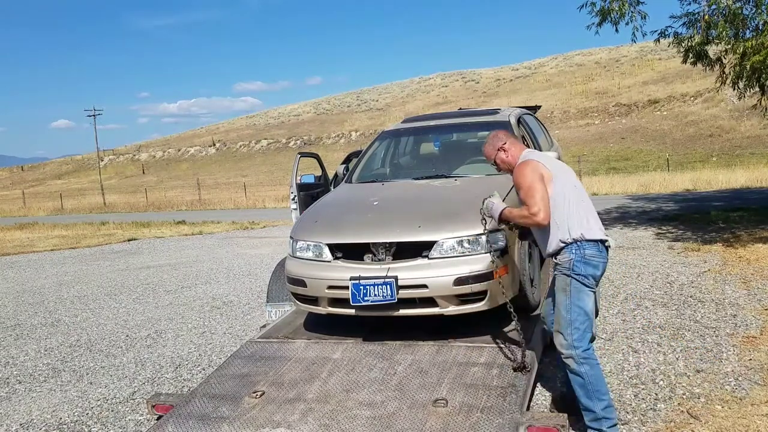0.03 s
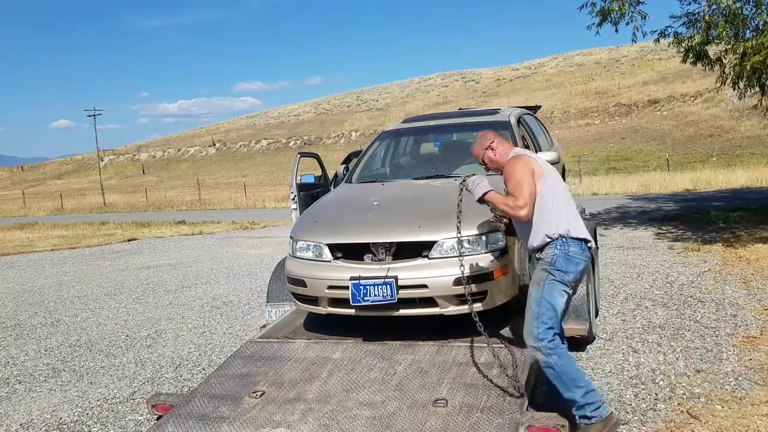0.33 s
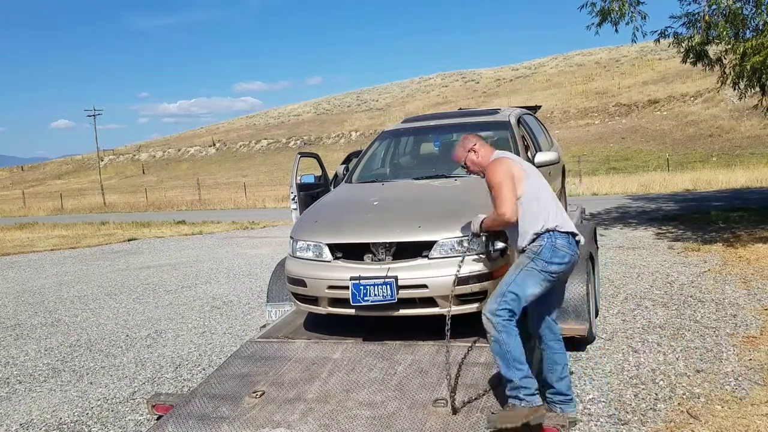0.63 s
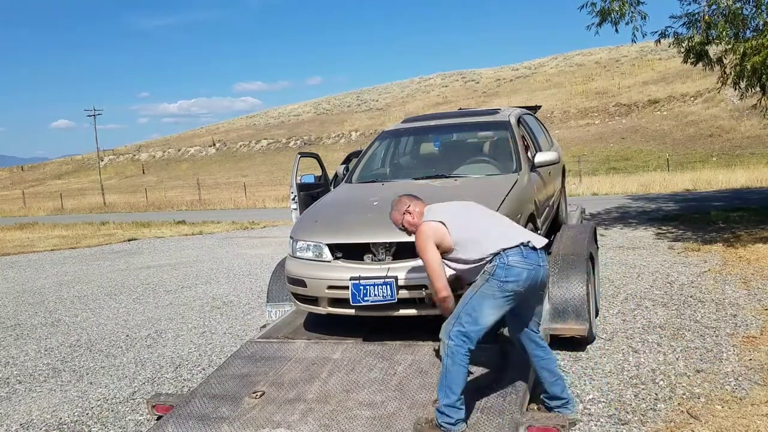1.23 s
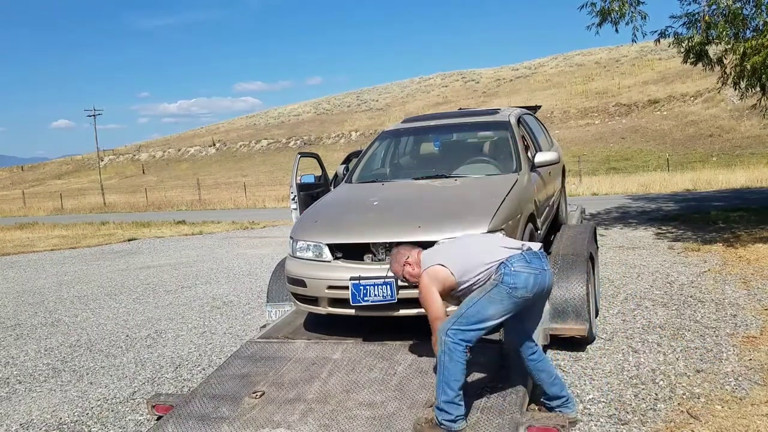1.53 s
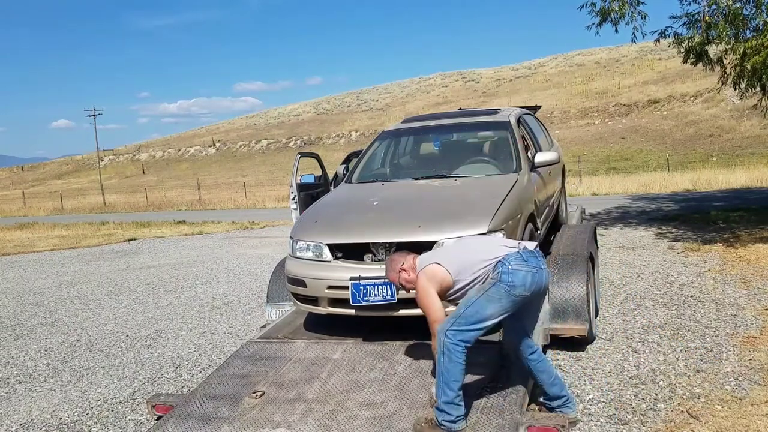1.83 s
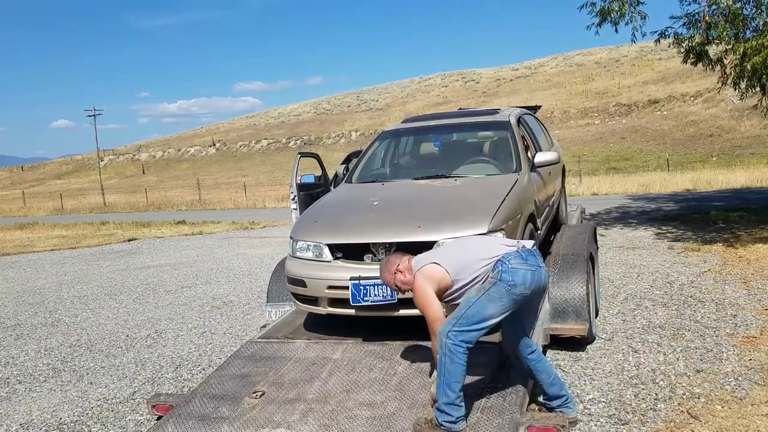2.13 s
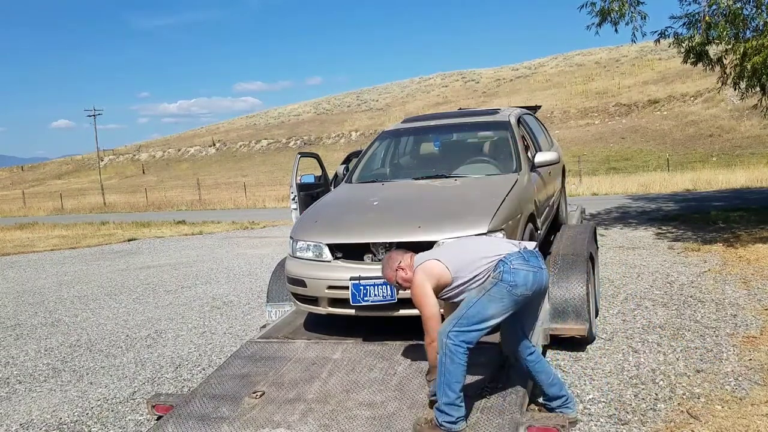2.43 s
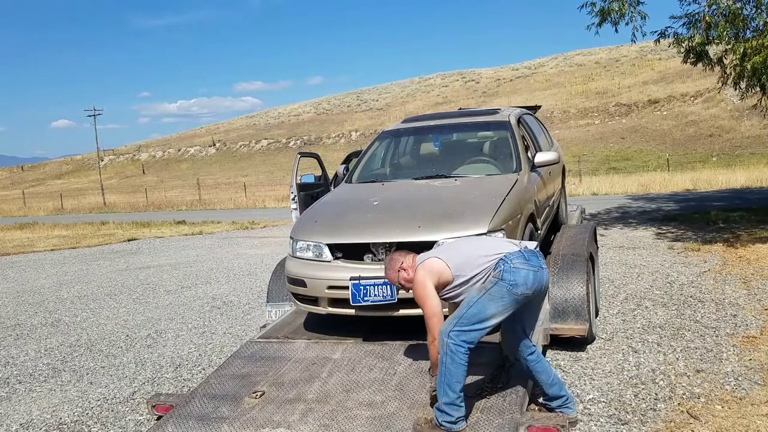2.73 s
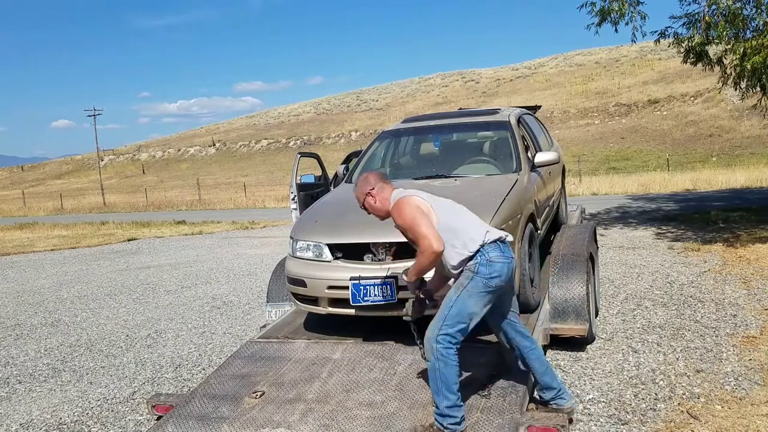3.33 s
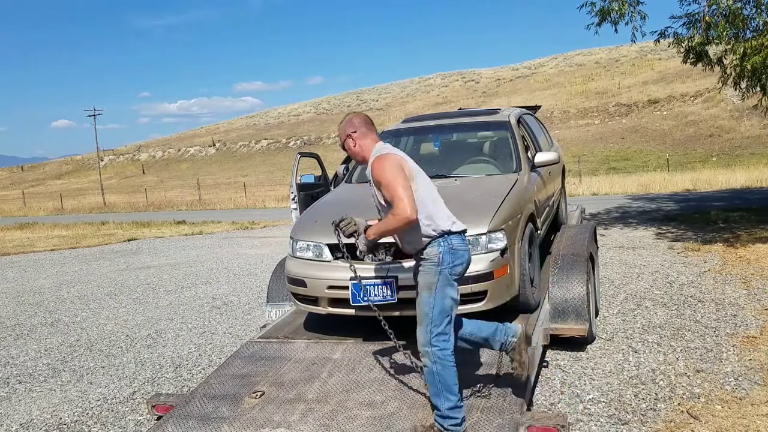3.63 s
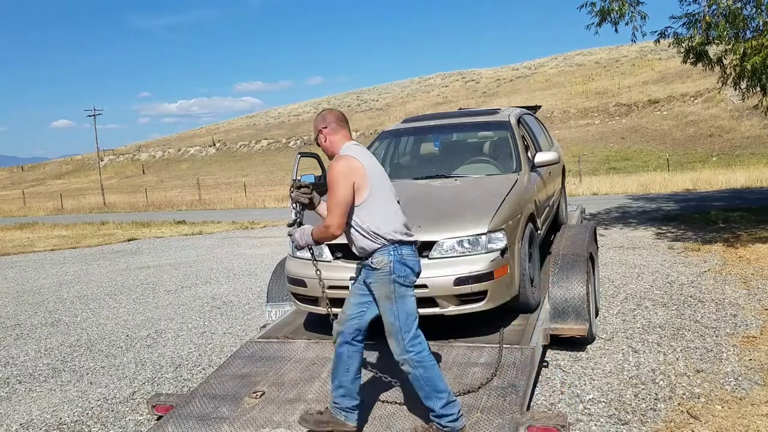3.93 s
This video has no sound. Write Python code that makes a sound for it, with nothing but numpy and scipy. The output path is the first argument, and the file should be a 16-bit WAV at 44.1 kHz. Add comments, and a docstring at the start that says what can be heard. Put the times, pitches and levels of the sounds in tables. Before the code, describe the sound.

A steel chain is hauled and dropped on a trailer ramp, links clacking and ringing. In a lull its hook taps lightly, then the chain drags again as boots thud. It is heard from a few metres away outdoors.

```python
"""A steel tow chain on the ramp of a car trailer, outdoors, in stereo from a few metres away.
First the chain is hauled over the ramp and dropped, as two light gusts brush the microphone: links
clack and ring very high, and the steel deck clatters under them. Around 2 s, in a lull, the hook taps
its anchor under the car. Then the chain is pulled out again, the loose hook jingles over the deck
and boots thud on the plate. A faint breeze lies under it all."""
import sys
import numpy as np
from scipy import signal
from scipy.fft import rfft, irfft
from scipy.io import wavfile

SR = 44100
rng = np.random.default_rng(int(sys.argv[2]) if len(sys.argv) > 2 else 0)


def digitize_waveform(pressure):
    """Quantize a signal to 16-bit integers and store it at the path in sys.argv[1].

    Rows of a 2-D input are taken as channels; values are limited to [-1, 1].
    """
    field = np.atleast_2d(pressure).T
    bounded = np.clip(field, -1, 1)
    quanta = np.round(bounded * 32767).astype(np.int16)
    wavfile.write(sys.argv[1], SR, quanta)


N = 176400  # 4 s


def amp(db):
    """Decibels to gain."""
    return 10 ** (np.asarray(db) / 20)


def unit(x):
    """Scale a response to unit energy, averaged over its channels."""
    return x / np.sqrt(np.mean(np.sum(x ** 2, axis=-1)))


def pan(left_db):
    """Stereo gains that put the left side this far above the right."""
    return amp(np.array([[left_db], [-left_db]]) / 2)


def decay(t, t60):
    """Envelope that falls 60 dB in t60 seconds."""
    return np.exp(-np.log(1000) * t / t60)


def along(table, hz):
    """Read a table on a log-frequency axis."""
    freqs, values = np.array(table, float).T
    return np.interp(np.log(hz + 1), np.log(freqs), values)


def add(out, start_s, x):
    """Mix a sound in at a time."""
    i = max(int(start_s * SR), 0)
    out[..., i:i + x.shape[-1]] += x[..., :max(N - i, 0)]


def stereo_noise(size):
    """White noise, alike on both sides in the bass and wide in the treble."""
    # stereo width at the microphone: f/Hz, side level/dB
    width = [(60, -11.5), (300, -22), (600, -13), (1100, -9), (2200, -6.5), (4500, -1.5), (15000, 2.5)]
    mid, side = rfft(rng.standard_normal((2, size)))
    w = amp(along(width, np.fft.rfftfreq(size, 1 / SR)))
    return irfft(np.array([mid + w * side, mid - w * side]) / np.sqrt(1 + w * w), size)


def colour(x, spectrum, size=2048):
    """Minimum-phase filter with the given spectrum."""
    cepstrum = irfft(np.log(amp(along(spectrum, np.fft.rfftfreq(size, 1 / SR)))))
    cepstrum[1:size // 2] *= 2
    cepstrum[size // 2 + 1:] = 0
    response = irfft(np.exp(rfft(cepstrum)))
    return signal.fftconvolve(x, response[None], axes=1)[:, :x.shape[1]]


def excite(force, response):
    """Sound of a body driven by a force."""
    return signal.oaconvolve(force[None], response, axes=1)[:, :N]


def ring(modes, vary_db, apart_rad, size=30000):
    """Decaying modes; their strengths and left-right phases depend on where the blow lands."""
    t, out = np.arange(size) / SR, 0
    for (hz, db, t60), (strength, skew) in zip(modes, rng.standard_normal((len(modes), 2))):
        phase = apart_rad * skew * np.array([[1], [-1]])
        out = out + amp(db + vary_db * strength) * decay(t, t60) * np.cos(2 * np.pi * hz * t + phase)
    return unit(out)


def steel(spectrum, tail_db, size=24000):
    """Response of one spot: a brief contact crack, then dense plate modes whose treble dies first."""
    # ring time of the plate: f/Hz, t60/s
    plate_t60 = [(100, 0.97), (300, 0.52), (1000, 0.43), (2500, 0.31), (5000, 0.13), (12000, 0.16)]
    t, hz = np.arange(size) / SR, np.fft.rfftfreq(size, 1 / SR)
    noise, tail = rfft(stereo_noise(size)), 0
    for centre, t60 in plate_t60:
        band = along([(f, f == centre) for f, _ in plate_t60], hz)
        tail = tail + irfft(noise * band, size) * decay(t, t60) / np.sqrt(t60)
    crack = stereo_noise(size) * decay(t, t60=0.031)
    return unit(colour(unit(crack) + amp(tail_db) * unit(tail), spectrum))


def knocks(events, modes, vary_db, apart_rad, chatter_s, detune=0., size=4096):
    """Blows that chatter briefly on a ringing body; detune scatters its pitches from blow to blow."""
    out, t = np.zeros((2, N)), np.arange(size) / SR
    for start, db in events:
        force = rng.standard_normal(size) * np.exp(-t / chatter_s)
        shifted = np.array(modes, float)
        shifted[:, 0] *= 1 + detune * rng.standard_normal(len(modes))
        body = np.pad(ring(shifted, vary_db, apart_rad, size=16000), ((0, 0), (0, size)))
        add(out, start, unit(excite(force, body)) * amp(db) * np.sqrt(.04 * SR))
    return out


def breeze():
    """Faint outdoor air; light gusts brush the microphone."""
    # spectra of the open air and of wind on the microphone: f/Hz, relative density/dB
    air_spectrum = [(15, -44), (25, -22), (48, -9.5), (301, 2), (394, -7), (501, -3), (3350, -21.5),
                    (5140, -19), (7280, -35), (15000, -35.5)]
    wind_spectrum = [(20, -22.5), (45, -16), (80, -8), (130, 0), (400, -40), (2000, -69.5)]
    # gusts: t/s, half length/s
    gusts = [(.1, 0.18), (0.846, .15)]
    t = np.arange(N) / SR
    air = colour(stereo_noise(N), air_spectrum)
    wind = colour(stereo_noise(N), wind_spectrum)
    swell = sum(np.exp(-((t - at) / half) ** 2) for at, half in gusts)
    return air / air.std() * amp(-53.5) + wind / wind.std() * swell * amp(-52.5)


def boots():
    """Dull thuds on the ramp, with little deep bass."""
    # boots and heavy loops of chain landing: t/s, level/dB
    landings = [(.42, -56), (.66, -50.5), (.8, -46.5), (.85, -42.5), (.925, -45), (1.27, -43.5),
                (2.63, -37), (2.755, -38.5), (2.827, -30.5), (3.1, -30), (3.15, -36.5), (3.2, -31),
                (3.255, -43)]
    # modes of the ramp: f/Hz, relative level/dB, t60/s
    ramp_modes = [(66.4, -5, .25), (107.7, 3.5, 0.34), (130.5, 4.5, 0.32), (150, -3, 0.31),
                  (177.2, 7.5, 0.47), (252, 9, 0.53)]
    thuds = knocks(landings, ramp_modes, vary_db=0.53, apart_rad=0.1, chatter_s=0.023)
    return signal.sosfilt(signal.butter(3, 75, "highpass", fs=SR, output="sos"), thuds)


def hook_taps():
    """Dry ticks of the hook on its anchor under the car, with a short ring."""
    # taps: t/s, relative level/dB
    taps = [(1.838, -41), (2.02, -57), (2.083, -46.5), (2.257, -48)]
    # modes of the anchor: f/Hz, relative level/dB, t60/s
    anchor_modes = [(3680, 0, 0.15), (4300, -10, .1), (4530, -7, .1), (4720, -2, .06), (5440, 6, 0.053)]
    # contact noise of a tap: f/Hz, relative density/dB
    tick_spectrum = [(800, -22), (2500, -7.5), (4800, 1), (7000, -15.5), (11000, -11.5), (15000, -20)]
    out = knocks(taps, anchor_modes, vary_db=1.1, apart_rad=.9, chatter_s=.003) * amp(-10)
    for start, db in taps:
        add(out, start, steel(tick_spectrum, tail_db=8) * amp(db - 1) * np.sqrt(0.013 * SR))
    return out


def hook_jingle(start_s=2.767, count=22, skips_per_s=19):
    """The loose hook skips unevenly over the deck; every touch brings out other modes."""
    # course of the drag: t/s, relative level/dB
    drag = [(2.77, -28.5), (2.948, -35.5), (3.29, -29.5), (3.358, -61), (3.414, -32.5), (3.516, -37),
            (3.534, -28), (3.578, -39.5), (4.0, -47)]
    # modes of the hook: f/Hz, relative level/dB, t60/s
    hook_modes = [(4630, -5, .06), (5230, 0, .08), (5480, -2, .07), (7800, -10, .07), (8280, -6, .09),
                  (9830, -6, .16), (9980, -3, .16), (10570, -2, .13), (10880, -2, .16), (11400, -12, .08),
                  (13660, -5, .16)]
    skip = np.arange(count)
    times = start_s + (skip + .9 * rng.random(count) * (skip > 0)) / skips_per_s
    levels = np.interp(times, *np.array(drag).T) + 5
    return knocks(zip(times, levels), hook_modes, vary_db=4.5, apart_rad=0.93, chatter_s=.018,
                  detune=0.0053)  # each touch rings at slightly different pitches


def pull_gain(part):
    """Strength of the sliding chain's "clack", "deck" or "ring" over time."""
    # one table per pull: t/s, then relative levels: link clack/dB, deck clatter/dB, link ring/dB
    pulls = [
        [(0.0, -26.5, -26, -18), (0.02, -37, -44, -21.5), (0.076, -26, -28, -28), (0.124, -34.5, -45, -23.5),
         (0.182, -26, -30, -31), (0.262, -38, -33.5, -41), (0.306, -24, -47, -27), (0.32, -28, -28, -62),
         (0.466, -64, -30.5, -75), (0.55, -16, -22.5, -37), (0.688, -20.5, -21.5, -29),
         (0.718, -33, -30.5, -52), (0.794, -52.5, -53, -73), (0.91, -69, -50, -97)],
        [(0.93, -25, -42, -46), (0.938, -24, -22.5, -20.5), (1.014, -21.5, -28, -19.5),
         (1.124, -20.5, -25.5, -23), (1.136, -19.5, -43, -17), (1.194, -23, -29, -26), (1.27, -29, -31, -13.5),
         (1.286, -26.5, -40, -16), (1.35, -25.5, -28.5, -27), (1.372, -25, -32, -28), (1.426, -38, -52, -55),
         (1.44, -31, -52, -42), (1.51, -44, -38, -50), (1.55, -32, -42, -60)],
        [(2.78, -29, -42, -50), (2.806, -21.5, -25, -39), (2.83, -27, -35, -53), (3.01, -21.5, -27.5, -26),
         (3.122, -22.5, -21.5, -41), (3.322, -19.5, -31, -20), (3.346, -41, -30.5, -25.5),
         (3.428, -21.5, -29, -28), (3.754, -30.5, -32, -27), (3.772, -45, -42, -21), (3.802, -26.5, -29, -41),
         (3.89, -32, -38, -60), (3.92, -39, -47, -52), (4.0, -30, -30, -62)],
    ]
    column = {"clack": 1, "deck": 2, "ring": 3}[part]
    t = np.arange(N) / SR
    return sum(np.interp(t, p[:, 0], amp(p[:, column]), left=0, right=0) for p in map(np.array, pulls))


def collisions(spots, count=4000, per_s=260, scatter_db=1.5):
    """Uneven link collisions, shared out over several spots; unit power in all."""
    jitter, where = rng.random((2, count))
    strength = amp(scatter_db * rng.standard_normal(count))
    at = ((np.arange(count) + 2 * jitter) / per_s * SR).astype(int)
    out, inside = np.zeros((spots, N)), at < N
    out[(where[inside] * spots).astype(int), at[inside]] = strength[inside]
    return out * np.sqrt(N / np.sum(out ** 2))


def free_links(count=8, ring_hz=15390, spread_hz=48, t60_s=0.1):
    """Free links tick together and ring at nearly the same very high pitch, beating against each other."""
    # tick of link on link: f/Hz, relative density/dB
    tick_spectrum = [(3000, -50), (8000, -24), (11500, -6), (14000, -3), (15400, 0)]
    forces = collisions(count) * pull_gain("ring")
    pitches = ring_hz + spread_hz * np.sqrt(3) * np.linspace(-1, 1, count)
    ringing = sum(excite(force, ring([(hz, 0, t60_s)], vary_db=0, apart_rad=.6, size=12000))
                  for force, hz in zip(forces, pitches))
    band = signal.butter(2, [ring_hz - 220, ring_hz + 220], "bandpass", fs=SR, output="sos")
    ticks = excite(forces.sum(0), steel(tick_spectrum, tail_db=-9)) * amp(-9)
    return (signal.sosfilt(band, ringing) + ticks) * pan(left_db=-3)


def slap(clack_db, length_s, count=12, scatter_db=3.9, sag_db=8, lead_db=1.5, size=4096):
    """Forces of a quick run of links landing, one row each; gentle contacts are duller."""
    link = np.arange(count)
    late = (link + rng.random(count) * (link > 0)) / count
    levels = scatter_db * rng.standard_normal(count) - sag_db * late + lead_db * (link == 0)
    at = np.clip((late * length_s * SR).astype(int), 0, size - 1)
    force = np.zeros((count, size))
    force[link, at] = unit(amp(levels)) * np.sqrt(length_s * SR)
    contact_hz = 4240 * 2 ** ((clack_db + 45) / 10)  # bandwidth grows an octave per 10 dB
    pole = np.exp(-2 * np.pi * contact_hz / SR)
    return signal.lfilter([(1 - pole) ** 2], [1, -2 * pole, pole ** 2], force)


def chain(spots=6):
    """Sliding and slapping links strike spots on the deck, which shakes its rails and frame."""
    # lengths of chain slapping down: t/s, link clack/dB, deck clatter/dB, duration/s
    slaps = [(.065, -38, -42, 0.022), (.135, -28.5, -31.5, 0.019), (.16, -31.5, -30, 0.011),
             (0.178, -24, -32, 0.024), (0.232, -31, -30.5, 0.014), (.278, -31, -38, 0.048),
             (.315, -30, -48, 0.022), (.364, -23, -29.5, 0.021), (0.442, -32, -33.5, 0.017),
             (0.469, -38, -39, .015), (0.515, -35, -49, .02), (0.538, -25, -26, 0.031),
             (0.621, -21, -32, 0.044), (.685, -36, -26.5, 0.022), (.92, -17, -23, 0.042),
             (.975, -27, -29, 0.028), (1.038, -29, -34.5, 0.025), (1.061, -26, -34, 0.016),
             (1.123, -23, -29.5, 0.023), (1.222, -21.5, -34.5, 0.017), (1.245, -19, -29.5, 0.039),
             (1.328, -27, -31.5, 0.036), (1.431, -31.5, -43, 0.026), (1.558, -28.5, -38.5, 0.026),
             (1.61, -47, -52, 0.048), (1.658, -42.5, -51, 0.015), (1.711, -47.5, -46.5, 0.023),
             (1.897, -40.5, -47.5, .02), (1.94, -40, -36.5, .02), (2.023, -48, -52, 0.025),
             (2.088, -48, -52, 0.036), (2.145, -48.5, -52, .025), (2.253, -37.5, -43, .035),
             (2.296, -47, -44.5, 0.05), (2.386, -47, -52, 0.021), (2.407, -42.5, -45, 0.024),
             (2.426, -43, -48.5, .02), (2.465, -45.5, -63, 0.012), (2.548, -39.5, -40, 0.053),
             (2.591, -34, -31.5, .025), (2.627, -27.5, -31, 0.013), (2.641, -24, -27.5, 0.018),
             (2.686, -32, -32.5, 0.022), (2.725, -40.5, -42, 0.031), (2.763, -19, -29.5, 0.021),
             (2.829, -22, -18.5, 0.038), (2.959, -28, -34, 0.024), (3.101, -20, -24.5, 0.019),
             (3.137, -24, -33, .025), (3.195, -20.5, -21, 0.021), (3.266, -21, -34, 0.031),
             (3.394, -24.5, -37, 0.034), (3.507, -28.5, -28.5, 0.03), (3.548, -28, -27.5, 0.02),
             (3.647, -28.5, -30.5, 0.016), (3.703, -26, -31.5, 0.018), (3.788, -26.5, -31, 0.024),
             (3.921, -29.5, -29.5, 0.023), (3.972, -27, -33.5, 0.03)]
    # modes of the trailer frame and of the edge rails: f/Hz, relative level/dB, t60/s
    frame_modes = [(176.7, -8.5, 0.96), (286.6, 0, 0.62), (313.7, 1.5, 0.63), (377.3, -5, 1),
                   (825, 0.5, 0.77), (1044, 0, 0.57)]
    rail_modes = [(1258, -8, 0.4), (1672, -3.5, 0.28), (2480, -3, 0.33), (2924, 4, 0.05), (3142, 1, 0.093),
                  (3294, -1.5, .18), (4660, 3.5, 0.074), (4940, -4.5, 0.08), (5180, -1, 0.1),
                  (5440, -6, 0.078)]
    # spectra of link clack and of deck clatter: f/Hz, relative density/dB
    clack_spectrum = [(500, -30), (1100, -8.5), (1700, -4.5), (2600, -4), (3900, -1), (5400, 2), (6300, -6),
                      (7300, -11), (8500, -9), (10000, -12), (13000, -11), (15500, -18)]
    deck_spectrum = [(30, -48), (60, -43), (95, -9.5), (160, -7.5), (300, 0.5), (400, .5), (550, 0.5),
                     (800, -2.5), (1150, 1), (1600, -2.5), (2500, -5.5), (5000, -40)]
    impacts = collisions(spots)
    friction = amp(-8.5) * rng.standard_normal((spots, N)) / np.sqrt(spots)
    clack_forces = (impacts + friction) * pull_gain("clack") * amp(-4)
    deck_forces = (impacts + friction) * pull_gain("deck") * amp(-5.5)
    for start, clack_db, deck_db, length_s in slaps:
        for force in slap(clack_db, length_s):
            spot = rng.integers(spots)
            add(clack_forces[spot], start, amp(clack_db) * force)
            add(deck_forces[spot], start, amp(deck_db) * force)
    frame = ring(frame_modes, vary_db=0.86, apart_rad=.15) * amp(-11)
    out = excite(deck_forces.sum(0), frame)
    for clack_force, deck_force in zip(clack_forces, deck_forces):
        clack = steel(clack_spectrum, tail_db=0)
        rails = ring(rail_modes, vary_db=2.1, apart_rad=0.82, size=24000) * amp(-10)
        deck = steel(deck_spectrum, tail_db=1.5)
        out = out + excite(clack_force, clack + rails) + excite(deck_force, deck)
    return out


def scene():
    """Chain, hook and boots on the trailer, a few metres from the microphone in the open air."""
    return (chain() + free_links() + hook_jingle() + hook_taps() + boots() + breeze()) * pan(left_db=0.4)


def record(dry):
    """The recorder cuts the top steeply above 15.7 kHz."""
    return signal.sosfilt(signal.ellip(10, .2, 80, 15700, fs=SR, output="sos"), dry)


dry = scene()
out = record(dry)
digitize_waveform(out)
```